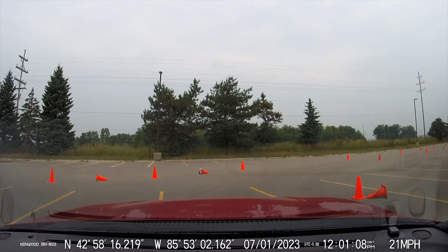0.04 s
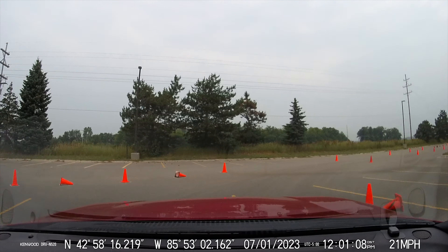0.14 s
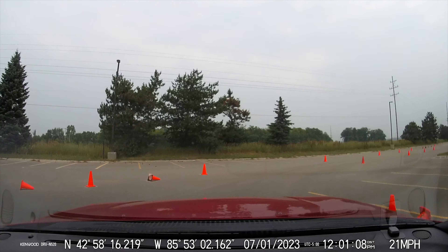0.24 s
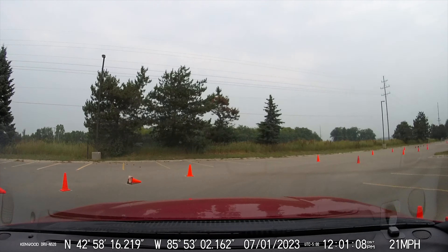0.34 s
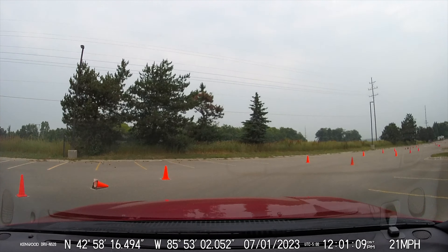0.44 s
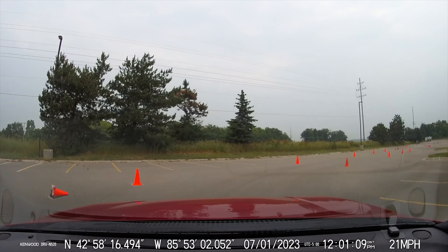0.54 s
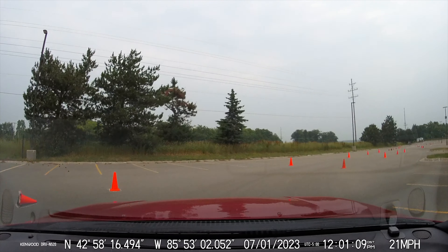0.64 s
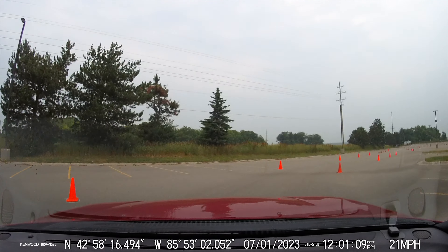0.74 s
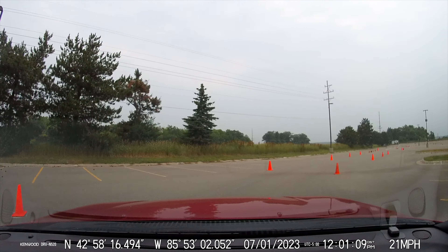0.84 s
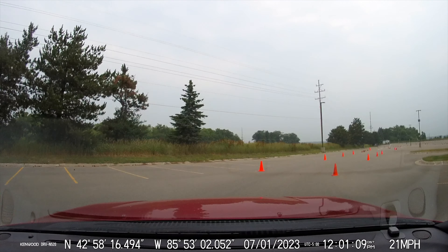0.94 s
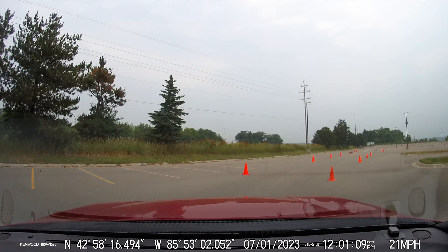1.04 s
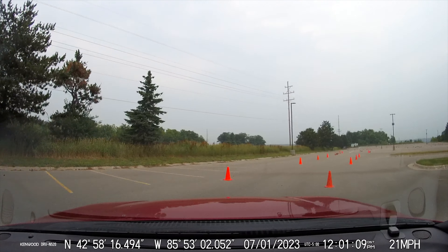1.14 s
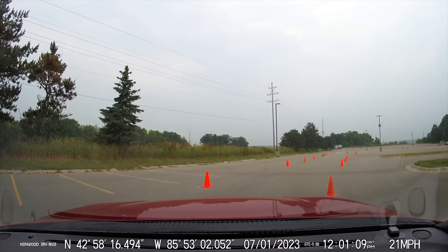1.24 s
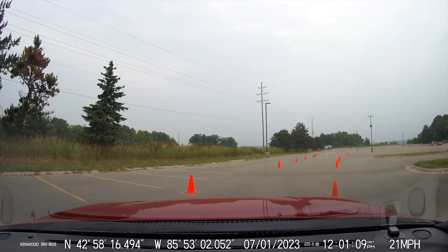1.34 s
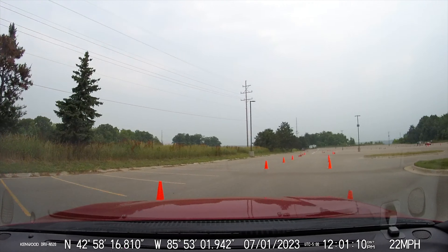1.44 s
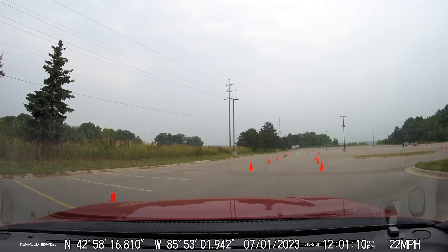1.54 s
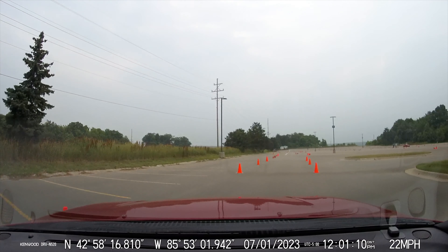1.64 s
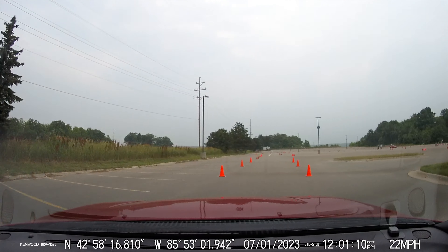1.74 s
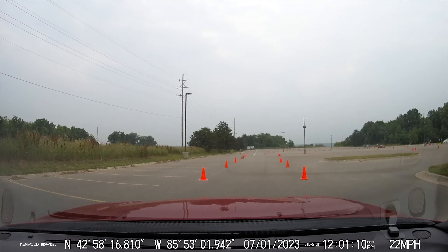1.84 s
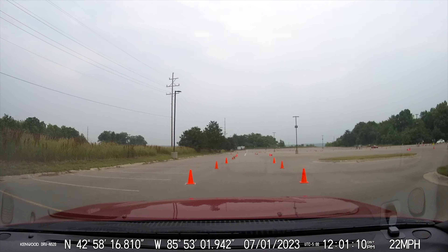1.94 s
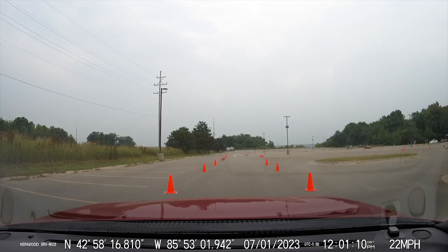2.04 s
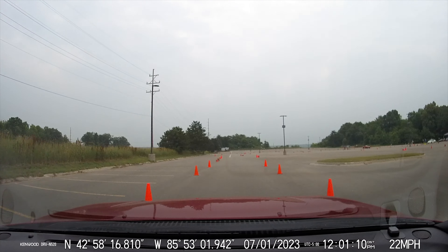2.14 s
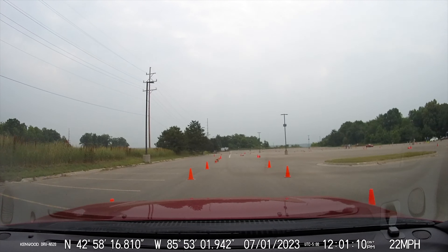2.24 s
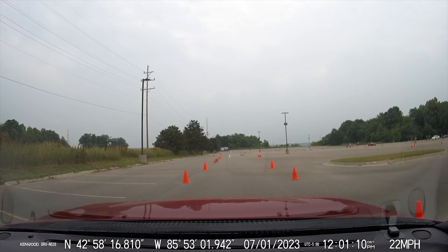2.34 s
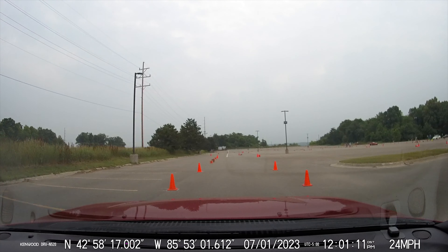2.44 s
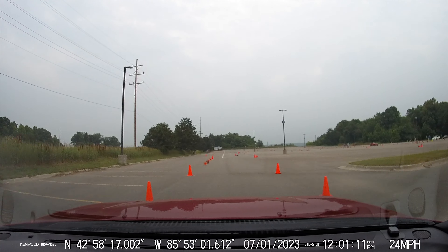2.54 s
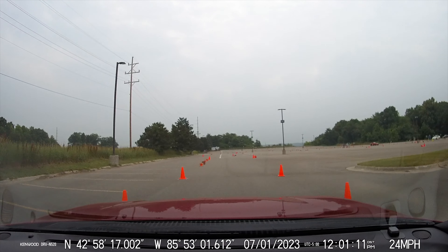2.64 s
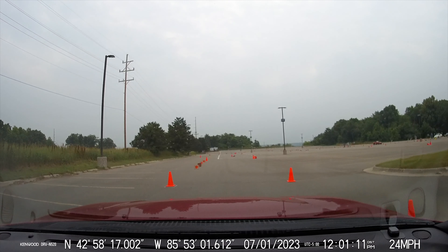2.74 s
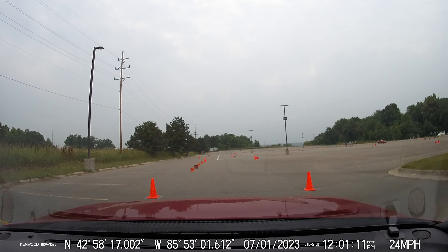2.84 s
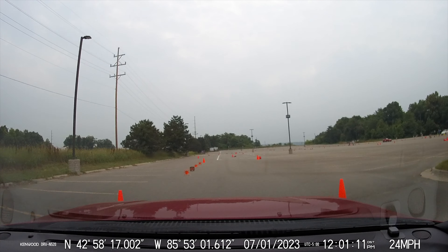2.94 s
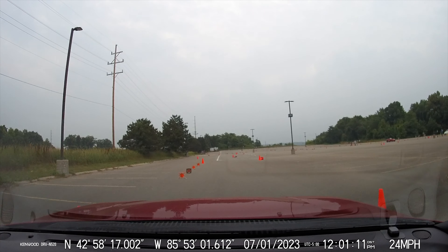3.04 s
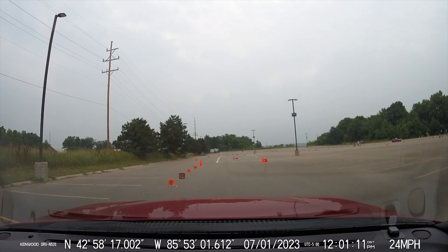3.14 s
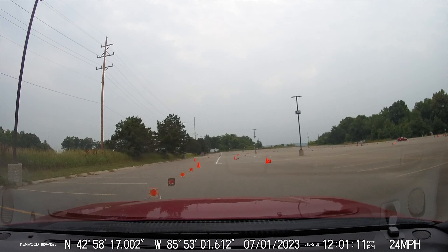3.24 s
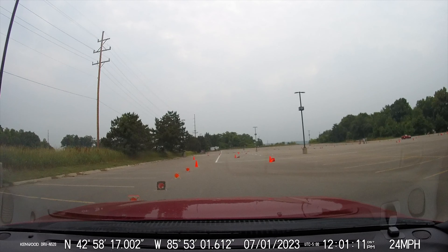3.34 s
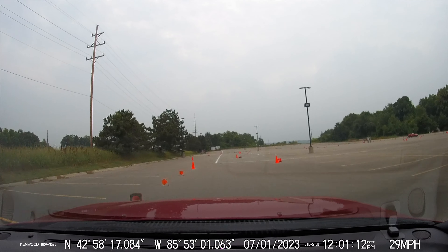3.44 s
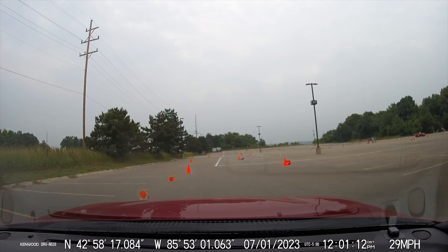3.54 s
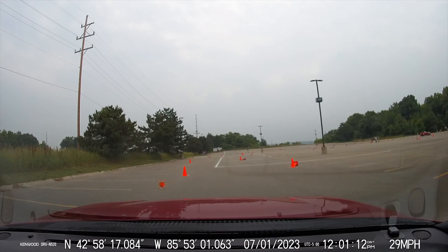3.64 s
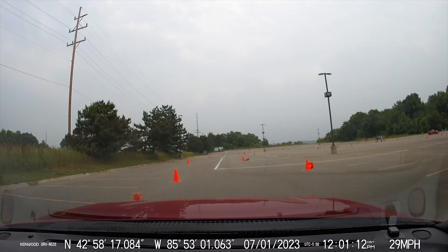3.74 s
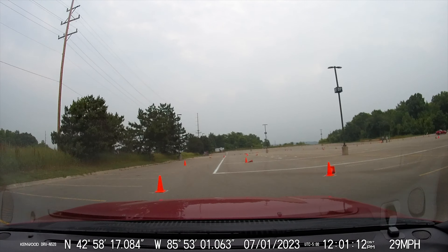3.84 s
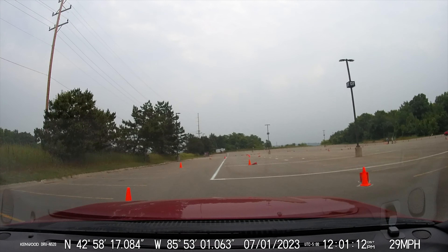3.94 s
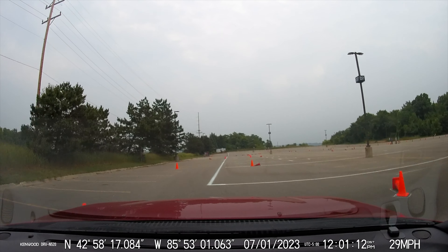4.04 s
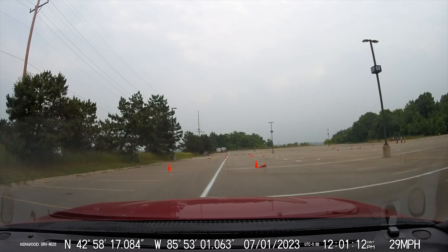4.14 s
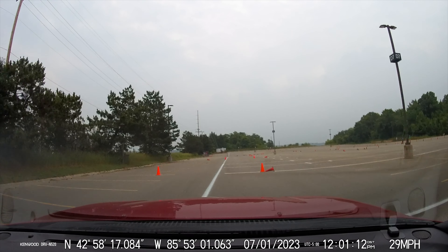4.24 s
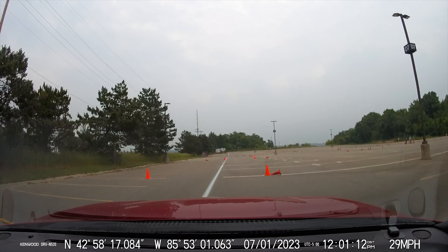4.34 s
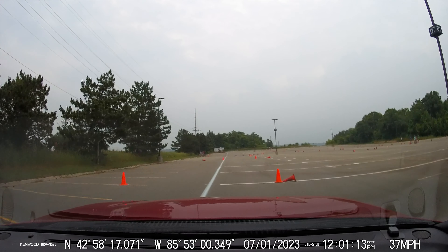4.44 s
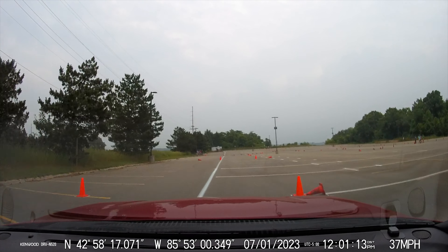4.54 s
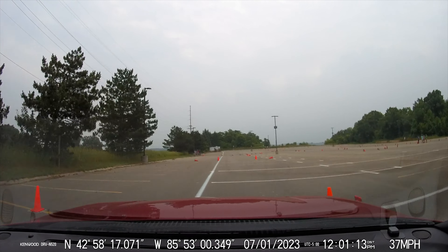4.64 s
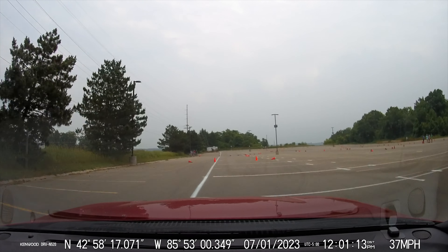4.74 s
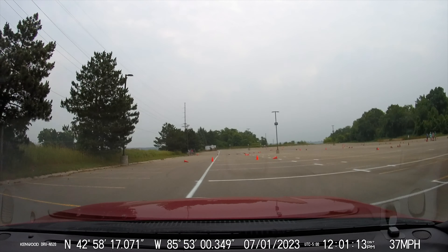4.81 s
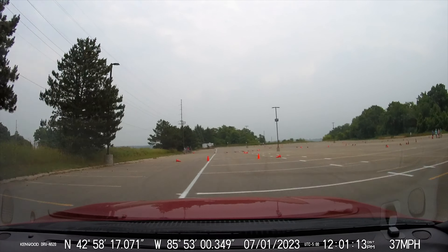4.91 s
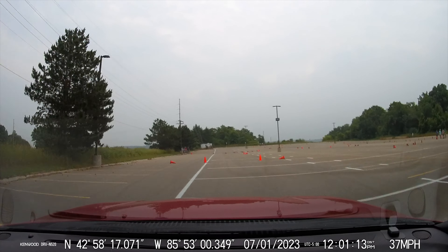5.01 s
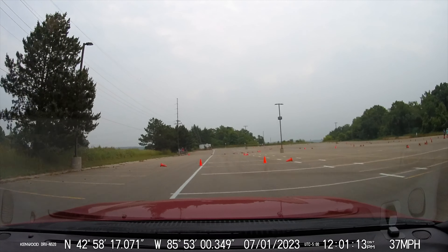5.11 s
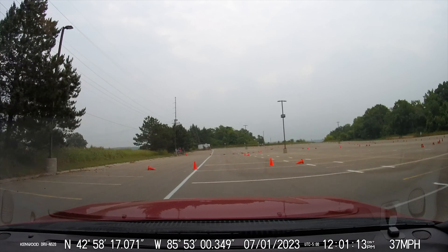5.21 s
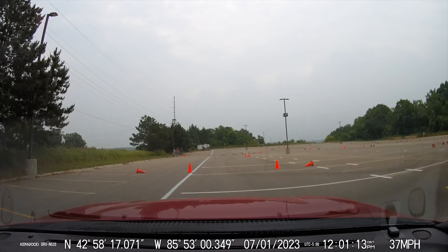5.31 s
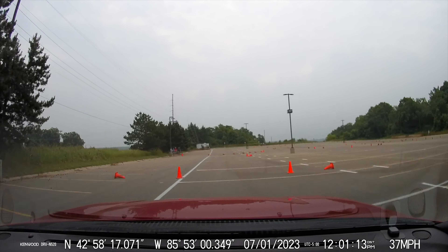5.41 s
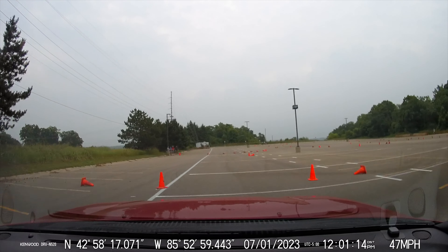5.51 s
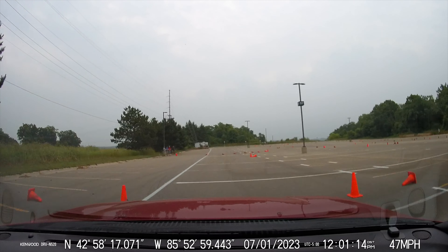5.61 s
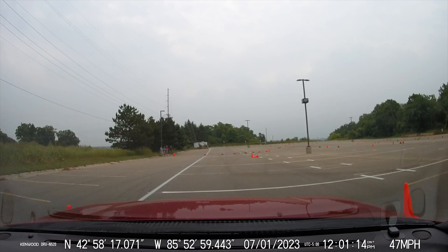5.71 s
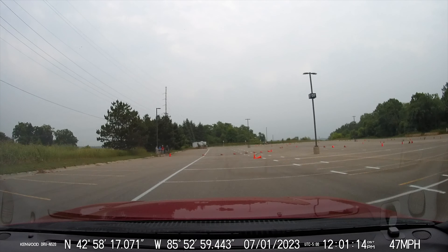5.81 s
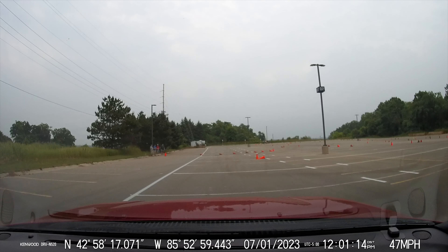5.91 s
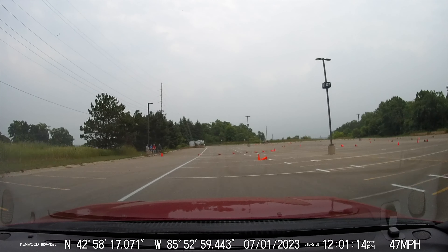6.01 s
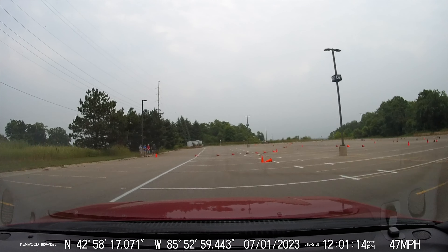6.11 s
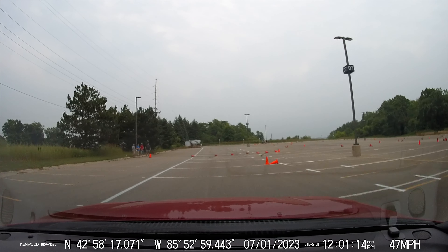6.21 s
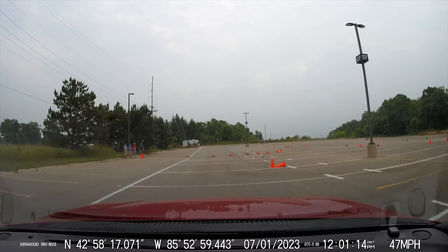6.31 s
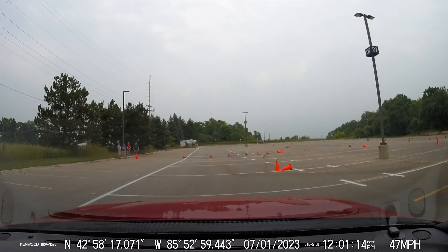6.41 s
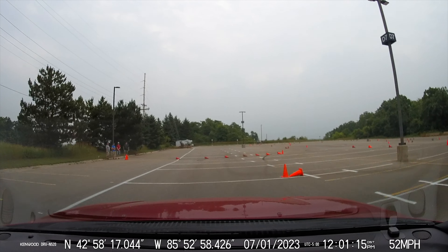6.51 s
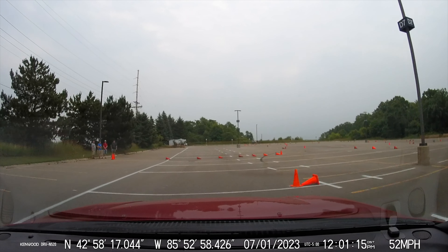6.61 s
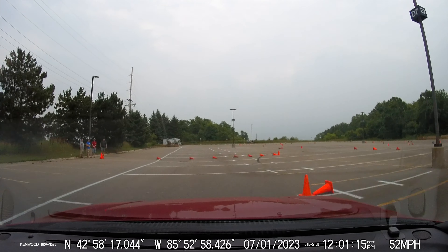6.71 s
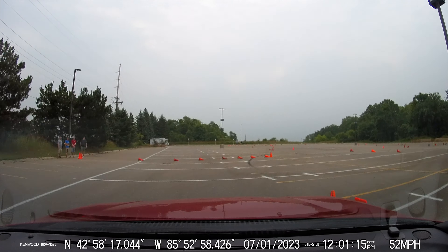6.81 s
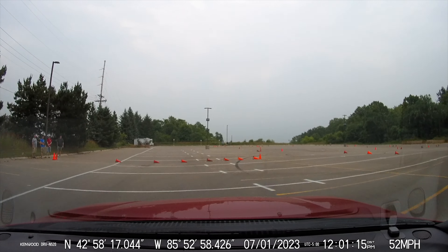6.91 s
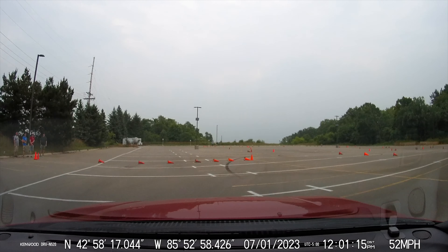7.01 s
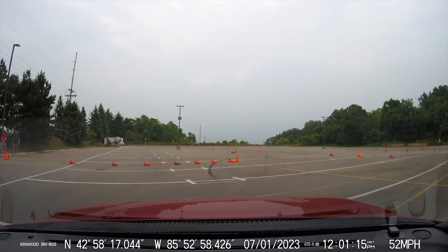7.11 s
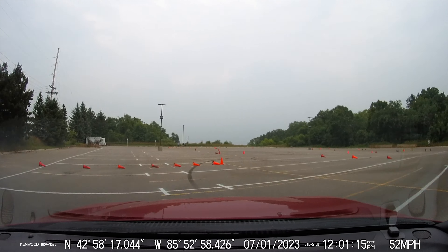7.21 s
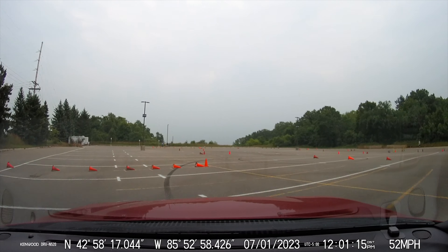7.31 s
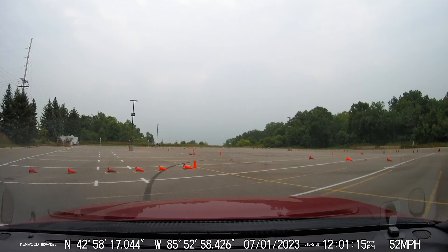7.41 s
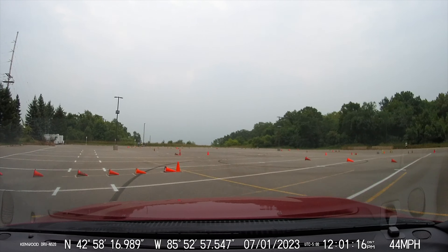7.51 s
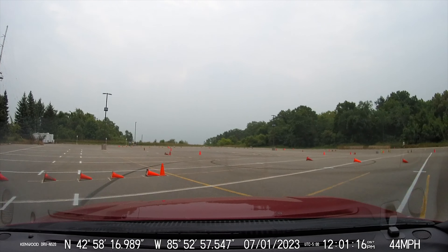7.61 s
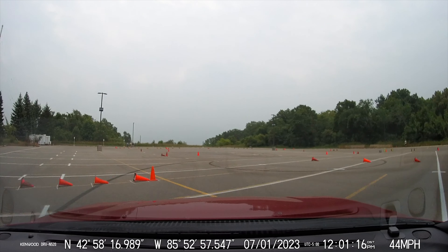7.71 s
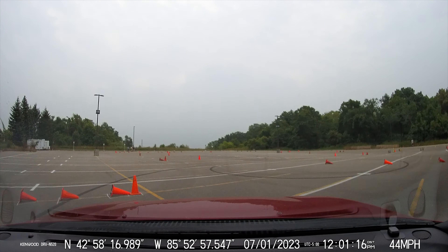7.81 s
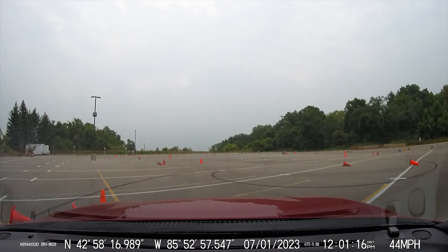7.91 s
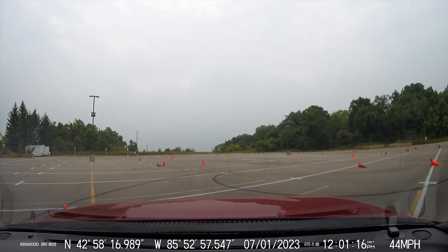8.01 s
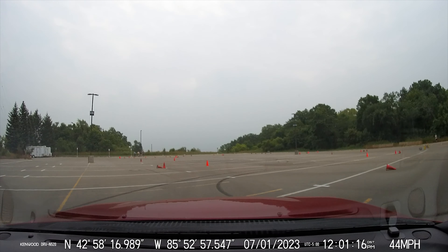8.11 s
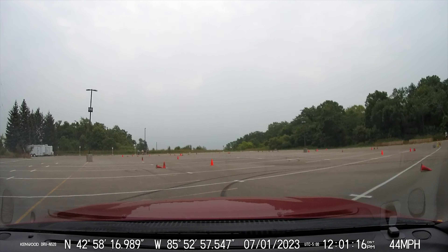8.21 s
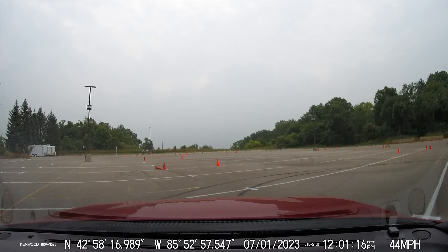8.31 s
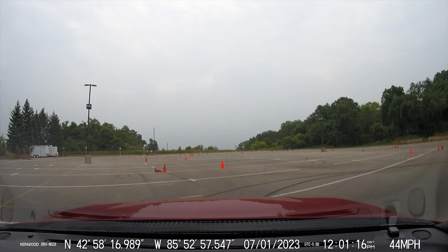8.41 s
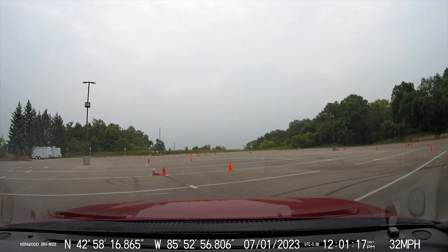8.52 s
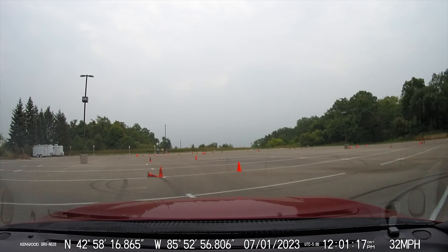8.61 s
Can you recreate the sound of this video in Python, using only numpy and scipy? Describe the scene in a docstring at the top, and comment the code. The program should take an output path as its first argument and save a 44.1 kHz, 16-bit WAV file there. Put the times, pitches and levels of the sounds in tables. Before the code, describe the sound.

Heard inside a car on a paved lot, a six-cylinder engine growls and climbs steadily while tires squeal faintly, then more clearly, leaving a corner. The throttle lifts with a soft thump, a puff of boost air and a falling breathy whistle. The engine coasts down over road roar, then tires squeal loudly in the next turn amid throttle blips. Trim knocks throughout.

```python
"""Turbocharged car on a cone course

Inside a six-cylinder car: it pulls out of a corner, lifts with a bypass puff, coasts, and is blipped through a turn.
Sine tones at crankshaft orders and resonant firing harmonics form the engine; a geared sine is the alternator.
Wandering stick-slip tones squeal in both corners, coloured noise is the road, decaying modes are the knocks.
A falling whistle follows the puff; short low driveline thumps at throttle lifts and random trim ticks are added."""
import sys
import numpy as np
from scipy import signal
from scipy.fft import rfft, irfft, next_fast_len
from scipy.io import wavfile

SR = 44100
rng = np.random.default_rng(int(sys.argv[2]) if len(sys.argv) > 2 else 0)


def wrap_up_sound(samples):
    """Save the sound to the file named by the first command line argument, as 16-bit audio."""
    columns = np.atleast_2d(samples).T
    # keep every value between -1 and 1, then stretch to whole-number steps
    tamed = np.clip(columns, -1, 1)
    steps = np.round(tamed * 32767).astype(np.int16)
    wavfile.write(sys.argv[1], SR, steps)


N = 381906

# driveline thumps at throttle lifts: (time [s], peak level [dB], frequency [Hz], half length [s])
SHUNTS = [(4.773, -44, 44.2, 0.11), (7.597, -38, 82.6, 0.018), (8.16, -34.5, 88, 0.019)]


def from_db(db):
    """Amplitude ratio of a level in dB."""
    return 10 ** (np.asarray(db) / 20)


def rms_one(x):
    """Scale to rms 1."""
    return x / np.sqrt(np.mean(x ** 2) + 1e-20)


def in_time(rows):
    """Interpolate each column of a time curve at every sample."""
    time_s, *columns = np.transpose(rows)
    return [np.interp(np.arange(N) / SR, time_s, column) for column in columns]


def at_hz(points, hz):
    """Spectrum level in dB, interpolated over log frequency."""
    point_hz, point_db = np.array(points).T
    return np.interp(np.log(hz), np.log(point_hz), point_db)


def drift(rate_hz):
    """Slow random signal of rms 1: noise through two equal poles, run at every 40th sample."""
    step = 40
    pole = np.exp(-2 * np.pi * rate_hz * step / SR)
    white = rng.standard_normal(N // step + 2002)
    slow = signal.lfilter([1], [1, -2 * pole, pole * pole], white)[2000:]  # drop the settling
    return np.interp(np.arange(N) / step, np.arange(len(slow)), rms_one(slow))


def angle(hz):
    """Running phase [rad] of a changing frequency."""
    return 2 * np.pi * np.cumsum(hz) / SR


def noise(spectrum):
    """Noise of rms 1 shaped by (frequency [Hz], relative level [dB]), falling steeply past both ends."""
    size = next_fast_len(N)
    hz = np.maximum(np.fft.rfftfreq(size, 1 / SR), 1)
    past_ends = np.maximum(1, np.maximum(hz / spectrum[-1][0], spectrum[0][0] / hz))
    gain = from_db(at_hz(spectrum, hz)) / past_ends ** 4
    return rms_one(irfft(rfft(rng.standard_normal(size)) * gain, size)[:N])


def burst(start_s, peak_db, attack_s, fall_db_per_s):
    """Envelope with a linear rise, then a steady fall in dB."""
    age_s = np.arange(N) / SR - start_s
    fall_db = fall_db_per_s * np.maximum(age_s - attack_s, 0)
    return np.clip(age_s / attack_s, 0, 1) * from_db(peak_db - fall_db)


def throttle(open_s=0.11, shut_s=0.04, dip_hz=23.03, dip_lag_s=0.044, dip_half_s=0.035):
    """Firing rate, load and boom: presses build load; the rate dips briefly after each driveline shunt."""
    # firing rate: (time [s], rate [Hz])
    speed = [(0.0, 119.5), (0.6, 132), (0.9, 127.8), (1.1, 131), (1.95, 160.5), (2.35, 164.3), (3.0, 191.3),
             (3.38, 208.5), (3.47, 222), (3.6, 219.8), (3.78, 229.4), (4.0, 240), (4.32, 258), (4.5, 266.5),
             (4.72, 282.5), (4.85, 269), (5.2, 267.4), (5.5, 262), (5.75, 253.5), (6.0, 238), (6.4, 204),
             (6.7, 189), (7.0, 163), (7.2, 164), (7.32, 186.5), (7.76, 187), (7.93, 175.5), (8.1, 190),
             (8.24, 178), (8.35, 204), (8.52, 186.6), (8.66, 190)]
    # throttle presses: (start [s], end [s], depth [0-1], boom of the firing tone [dB])
    presses = [(-0.2, 0.84, 1, -4), (1.15, 4.715, 1, 1.5), (7.24, 7.55, 0.81, -4), (7.67, 8.06, 0.54, 3),
               (8.25, 8.7, 0.84, 1)]
    t = np.arange(N) / SR
    firing_hz, = in_time(speed)
    load, boom_db, dip = 0, 0, 0
    for start_s, end_s, depth, press_boom_db in presses:
        opening = (t - start_s) / open_s
        closing = 1 - (t - end_s) / shut_s
        down = np.clip(np.minimum(opening, closing), 0, 1)
        load = load + min(depth, 1) * down
        boom_db = boom_db + press_boom_db * down
    for shunt_s, *_ in SHUNTS:
        dip = dip + np.exp(-((t - shunt_s - dip_lag_s) / dip_half_s) ** 2)
    return firing_hz - dip_hz * dip, load, boom_db


def loudness(firing_hz, load, full_boost_hz=203):
    """Engine reference level in dB: rises with speed; on throttle the rise ends at full boost."""
    octaves = np.log2(firing_hz / full_boost_hz)
    loaded_db = -28.5 + 24 * np.minimum(octaves, 0)
    coasting_db = -41 + 17 * octaves
    return load * loaded_db + (1 - load) * coasting_db


def engine(crank_hz, load, engine_db, half_order_db=-11.5, rough=0.25, half_rough=0.81, rough_rate_hz=6.2):
    """Unequal banks and cylinders sound whole and half crankshaft orders, weighted by the cabin response."""
    # cabin response: (frequency [Hz], level [dB])
    cabin = [(52.0, -27), (68.0, -14.5), (85.0, -12.5), (105.0, -9.5), (125.0, -21), (165.0, -3.5),
             (200.0, -7), (250.0, -8.5), (290.0, -8), (330.0, -1.5), (380.0, -3), (420.0, -4.5),
             (485.0, -1), (515.0, -2.5), (555.0, -6.5), (600.0, -2), (660.0, -4.5), (725.0, -3),
             (850.0, -13), (1400.0, -13)]
    # whole orders besides the first three firing harmonics:
    # (order, level on throttle [dB], level coasting [dB])
    whole_orders = [(1.0, 2, -1), (2.0, 5.5, -3), (4.0, -6, -1.5), (5.0, -1, -6.5), (7.0, -7.5, 2),
                    (8.0, -3, -4.5), (10.0, -4.5, -5.5), (11.0, -3, -11), (12.0, -2, -3),
                    (13.0, -16.5, -5.5), (14.0, -13.5, -11), (15.0, -3.5, 6)]
    crank = angle(crank_hz)
    shut = np.clip(1 - 2 * load, 0, 1)
    wholes = [(order, on_db + shut * (off_db - on_db), rough) for order, on_db, off_db in whole_orders]
    halves = [(k + .5, half_order_db, half_rough) for k in range(1, 17)]
    tones = 0
    for order, level_db, unsteady in wholes + halves:
        phase = order * crank + rng.uniform(0, 2 * np.pi)
        # no two combustions are alike: size and phase waver
        waver = unsteady * drift(rough_rate_hz) * np.sin(phase + 2 * drift(2))
        gain = from_db(level_db + at_hz(cabin, order * crank_hz))
        tones = tones + gain * (np.sin(phase) + waver)
    return np.sqrt(2) * from_db(engine_db - 1.78) * tones


def exhaust(firing_hz, load, engine_db, boom_db, coasting_rough=0.42):
    """Firing harmonics swell as they climb through pipe resonances; without load they are less even."""
    # exhaust resonances: (frequency [Hz], width [Hz], level [dB])
    resonances = [(174.4, 24, 7.5), (214, 32, -1.5), (255.3, 15, -5.5), (325, 14, -0.5), (374.4, 30, 5),
                  (441, 12, 0), (476.2, 13, 5.5), (534, 23, 1), (706.7, 15, 0), (782, 28, -6.5)]
    # firing harmonics: (multiple, level on throttle [dB], level coasting [dB], roughness [0-1])
    firings = [(1.0, -0.5, 1, 0.06), (2.0, -4.5, -8.5, 0.2), (3.0, -4, -1.5, .35)]
    firing, out = angle(firing_hz), 0
    for multiple, on_db, off_db, rough in firings:
        k = round(multiple)
        pipe = np.abs(sum(from_db(db) / (1 + 2j * (k * firing_hz - hz) / width_hz)
                          for hz, width_hz, db in resonances))
        unsteady = (rough + coasting_rough * (1 - load)) * drift(14)
        tone = np.sin(k * firing) + unsteady * np.sin(k * firing + 2 * drift(1.6))
        level_db = engine_db + off_db + load * (on_db - off_db)
        if k == 1:
            level_db = level_db + boom_db
        out = out + from_db(level_db) * pipe * tone
    return np.sqrt(2) * out


def bypass_valve(puff_s=4.74, whistle_s=4.88, start_hz=6540, sag_hz_per_s=2100, scatter=.03):
    """Boost escapes as a noise puff, then as a breathy whistle that falls for one second."""
    # puff colour: (frequency [Hz], relative level [dB])
    puff_colour = [(1000, -4), (1800, 12), (2800, 5.5), (4000, -2.5), (5200, -22), (16000, -30.5)]
    whistle_hz = start_hz - sag_hz_per_s * np.clip(np.arange(N) / SR - whistle_s, 0, 1)
    whistle = np.sin(angle(whistle_hz * (1 + scatter * drift(250))))  # fast pitch jitter makes it breathy
    puff_swell = burst(puff_s, peak_db=-50.5, attack_s=.05, fall_db_per_s=33.5)
    whistle_swell = burst(whistle_s, peak_db=-63.5, attack_s=0.033, fall_db_per_s=85)
    return puff_swell * noise(puff_colour) + whistle_swell * whistle


def alternator(firing_hz, octave_db=-3.0):
    """Thin belt-driven whine and its octave, geared to the crankshaft."""
    # whine: (time [s], level [dB])
    whine = [(0, -115), (0.9, -108), (1.3, -87.5), (2.4, -99), (3.3, -84.5), (4.6, -86.5), (5.6, -80),
             (7.2, -99)]
    whine_db, = in_time(whine)
    phase = angle(29.8 * firing_hz)
    return from_db(whine_db) * (np.sin(phase) + from_db(octave_db) * np.sin(2 * phase))


def shunts():
    """Short low driveline thumps at the throttle lifts: sines in bell-shaped envelopes."""
    t = np.arange(N) / SR
    out = 0
    for shunt_s, peak_db, hz, half_s in SHUNTS:
        swell = from_db(peak_db) * np.exp(-((t - shunt_s) / half_s) ** 2)
        out = out + swell * np.sin(2 * np.pi * hz * (t - shunt_s))
    return out


def squeal(slides, level_db, wander, wander_rate_hz, flutter_db, scatter, scatter_hz, octave_db, arch=0.576):
    """Tread blocks stick and slip near one pitch; each slide swells in an arch and pulls the shared pitch."""
    t, power, pull = np.arange(N) / SR, 1e-20, 0
    for start_s, length_s, first_hz, last_hz, slide_db in slides:
        along = np.clip((t - start_s) / length_s, 0, 1)
        share = (from_db(slide_db) * (4 * along * (1 - along)) ** arch) ** 2
        power = power + share
        pull = pull + share * (first_hz + (last_hz - first_hz) * along)
    # blocks slipping out of step spread a rough band around the tone
    lowpass = signal.butter(3, scatter_hz, fs=SR, output="sos")
    in_phase, quadrature = rms_one(signal.sosfilt(lowpass, rng.standard_normal((2, N))))
    grip = from_db(flutter_db * drift(34)) * (1 + scatter * (in_phase + 1j * quadrature))
    grip = grip / np.sqrt(1 + np.abs(grip / 2) ** 2)  # friction limits the tread's swing
    grip = grip / np.sqrt(np.mean(np.abs(grip) ** 2))
    pitch_hz = pull / power * (1 + wander * drift(wander_rate_hz))
    swing = grip * np.exp(1j * angle(pitch_hz))
    return np.sqrt(2 * power) * from_db(level_db) * np.real(swing + from_db(octave_db) * swing ** 2)


def knocks(spread_octaves=0.41, contact_s=0.00096):
    """Loose trim and grit: each knock rings the dashboard modes near its pitch, with a short noise rattle."""
    # knocks: (time [s], peak level [dB], contact pitch [Hz], rattle level [dB], rattle t60 [s])
    hits = [(0.268, -22.5, 950, -72, 0.037), (0.46, -28, 900, -49, .06), (0.465, -18, 1130, -43, 0.11),
            (0.512, -60, 3600, -54, .08), (2.393, -16, 1050, -48.5, 0.078), (2.85, -19, 1100, -58, 0.067),
            (4.914, -15, 700, -62, .04), (6.007, -10.5, 960, -40, 0.068), (6.981, -21.5, 750, -73, 0.031),
            (7.930, -16.5, 635, -67, .04), (8.077, -20, 1000, -65, 0.033), (8.070, -9, 970, -48.5, 0.034),
            (8.53, -49, 3550, -49, 0.11)]
    # dashboard modes: (frequency [Hz], relative level [dB], t60 [s])
    modes = [(425, -15.5, 0.028), (665, -2.5, 0.042), (940, 18, 0.016), (1110, 15.5, 0.022),
             (1360, -23, 0.02), (2450, -17.5, 0.027), (3550, -42.5, .04)]
    # rattle colour: (frequency [Hz], relative level [dB])
    rattle_colour = [(1500, 9), (3900, 0.5), (5500, -27.5), (9000, -30.5), (15000, -28.5)]
    out, t = np.zeros(N), np.arange(SR // 8) / SR
    rattle = noise(rattle_colour)
    contact = 1 - np.exp(-(t / contact_s) ** 2)  # plastic gives a little: soft onset
    for hit_s, peak_db, pitch_hz, rattle_db, rattle_t60_s in hits:
        ring = 0
        for hz, mode_db, t60_s in modes:
            nearness = np.exp(-(np.log2(hz / pitch_hz) / spread_octaves) ** 2)
            ring = ring + from_db(mode_db - 60 * t / t60_s) * nearness * np.sin(2 * np.pi * hz * t)
        ring = contact * ring
        at = np.minimum(round(hit_s * SR) + np.arange(len(t)), N - 1)
        tail = contact * from_db(rattle_db - 60 * t / rattle_t60_s) * rattle[at]
        out[at] += from_db(peak_db) * ring / np.abs(ring).max() + tail
    return out


def road(crank_hz, engine_db, throb=0.4, full_load_db=-21.5, bumps_db=0.85):
    """Rumble, roar and hiss; under load the intake air throbs at the firing rate and once per crank turn."""
    # road and air: (time [s], relative roar level [dB], relative hiss level [dB])
    levels = [(0.0, -44, -70.5), (0.79, -44.5, -74.5), (2.2, -40.5, -71), (2.8, -38, -67),
              (4.58, -36.5, -66), (5.02, -33, -59), (5.95, -35.5, -65.5), (6.5, -39.5, -71),
              (8.66, -41, -70.5)]
    # noise colours: (frequency [Hz], relative level [dB])
    rumble_colour = [(20, -22.5), (40, -10.5), (65, -10.5), (110, -6.5), (165, 2.5), (230, -7.5),
                     (400, -21.5)]
    roar_colour = [(130, -21.5), (240, 0), (400, 2.5), (600, 1.5), (850, 2), (1150, 2.5), (1400, -5.5),
                   (1700, -14), (2200, -20.5), (2800, -41)]
    hiss_colour = [(1200, 0.5), (2000, 12), (2700, 2.5), (3600, 2.5), (4300, -8.5), (5100, -26),
                   (8500, -36.5), (13000, -26.5), (16000, -28.5)]
    roar_db, hiss_db = in_time(levels)
    crank = angle(crank_hz)
    loading = np.minimum(from_db(engine_db - full_load_db), 1)
    pulsing = 1 + throb * loading * (np.sin(3 * crank) + np.sin(crank))
    surface = from_db(bumps_db * drift(18))
    rumble = from_db(-46.5 + 0.18 * (roar_db - np.mean(roar_db))) * noise(rumble_colour)
    roar = from_db(roar_db + 6.0) * noise(roar_colour)
    hiss = from_db(hiss_db + 6.0) * noise(hiss_colour)
    return rumble + surface * pulsing * (roar + hiss)


def ticks(per_s=4.0, level_db=-71, decay_s=0.0038):
    """Small dashboard parts tick faintly at random: decaying bursts of bright noise."""
    touches = (rng.random(N) < per_s / SR) * rng.uniform(.3, 1, N)
    dying = signal.lfilter([1], [1, -np.exp(-1 / (decay_s * SR))], touches + 1e-18)
    return from_db(level_db) * dying * noise([(3000, -5.5), (8000, -7.0), (15000, 2.5)])


def scene():
    """Sum of engine, tyres, trim and road in the cabin, one channel."""
    # squeals, loaded front tyre then lighter inside tyre:
    # (start [s], length [s], first pitch [Hz], last pitch [Hz], relative peak level [dB])
    front_slides = [(0.04, .22, 1314, 1285, -43.5), (0.83, .16, 1308, 1310, -43.5),
                    (1.1, 0.73, 1186, 1233, -39.5), (1.27, 0.099, 1164, 1178, -29.5),
                    (1.44, 0.08, 1193, 1167, -31), (1.71, .39, 1217, 1253, -32),
                    (1.865, 0.053, 1235, 1240, -26.5), (1.97, .17, 1246, 1374, -35),
                    (6.72, 0.42, 1215, 1209, -29.5), (6.89, 0.27, 1188, 1206, -22.5),
                    (7.1, 0.082, 1110, 1130, -21), (7.15, .31, 1197, 1204, -25),
                    (7.4, 0.343, 1201, 1212, -25.5)]
    inner_slides = [(1.85, .11, 1760, 1780, -33.5), (6.8, 0.83, 1407, 1428, -40),
                    (7.14, 0.18, 1460, 1396, -24.5), (7.42, 0.17, 1683, 1566, -30),
                    (7.55, .19, 1458, 1407, -27)]
    firing_hz, load, boom_db = throttle()
    crank_hz = firing_hz / 3  # a six fires three times per turn
    engine_db = loudness(firing_hz, load)
    motor = engine(crank_hz, load, engine_db) + exhaust(firing_hz, load, engine_db, boom_db)
    motor = motor + bypass_valve() + alternator(firing_hz) + shunts()
    front = squeal(front_slides, level_db=1.5, wander=0.00906, wander_rate_hz=43, flutter_db=3.5,
                   scatter=0.74, scatter_hz=113, octave_db=-38)
    inner = squeal(inner_slides, level_db=-1.0, wander=0.014, wander_rate_hz=45, flutter_db=5.5,
                   scatter=0.52, scatter_hz=105, octave_db=-42.5, arch=0.94)
    return (motor + front + inner + knocks() + road(crank_hz, engine_db) + ticks())[None]


def record(dry, cutoff_hz=15800):
    """Cut the top steeply with an elliptic low-pass."""
    return signal.sosfilt(signal.ellip(10, .1, 80, cutoff_hz, fs=SR, output="sos"), dry)


dry = scene()
out = record(dry)
wrap_up_sound(out)
```